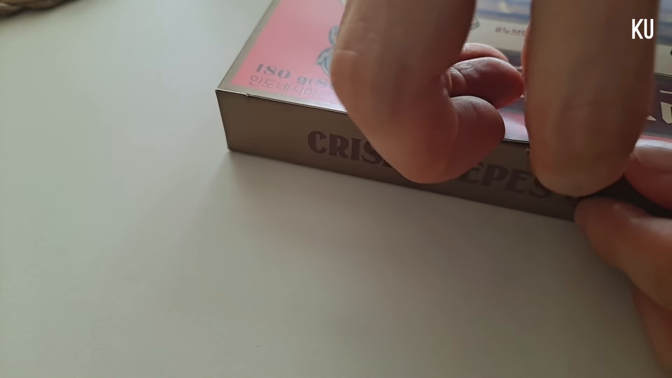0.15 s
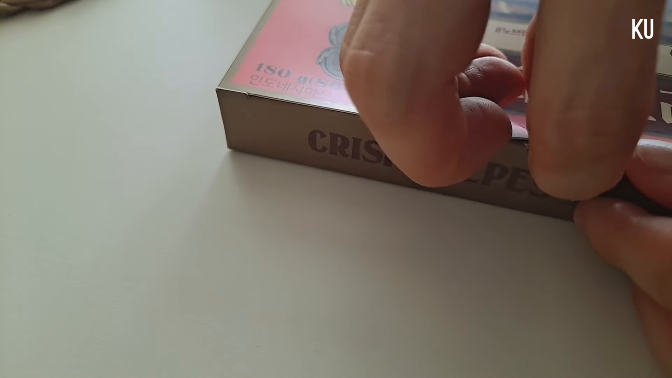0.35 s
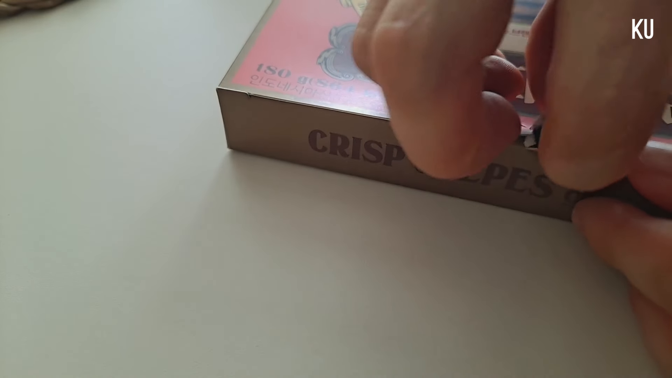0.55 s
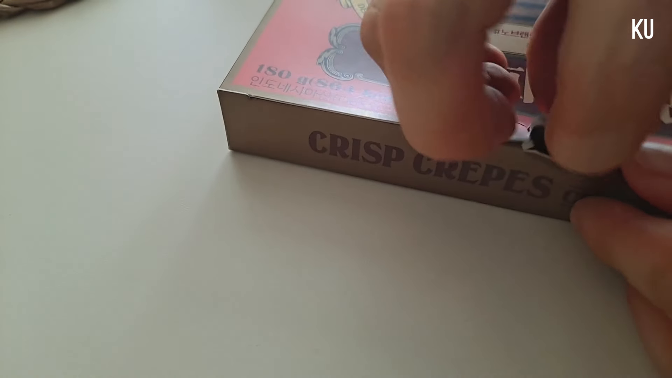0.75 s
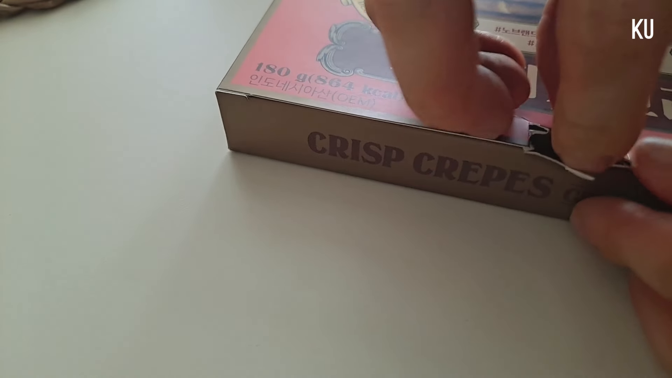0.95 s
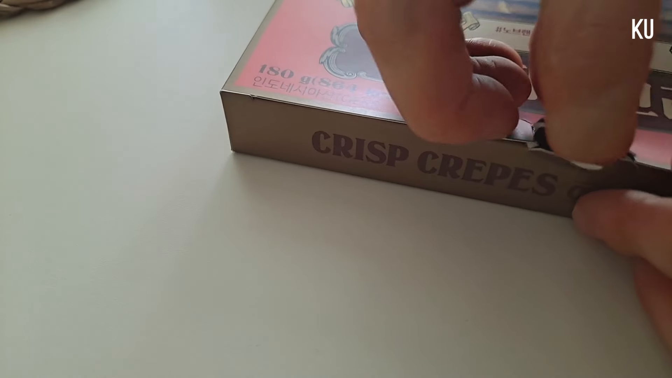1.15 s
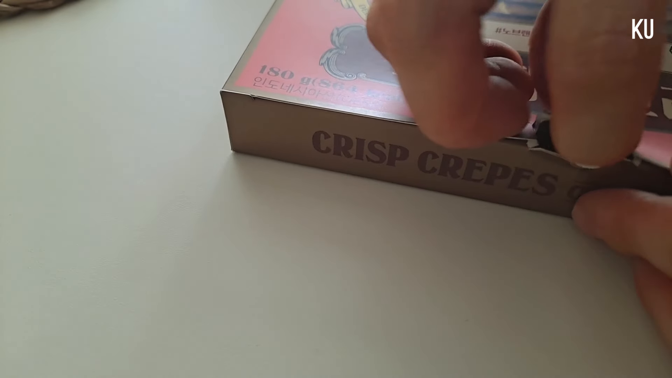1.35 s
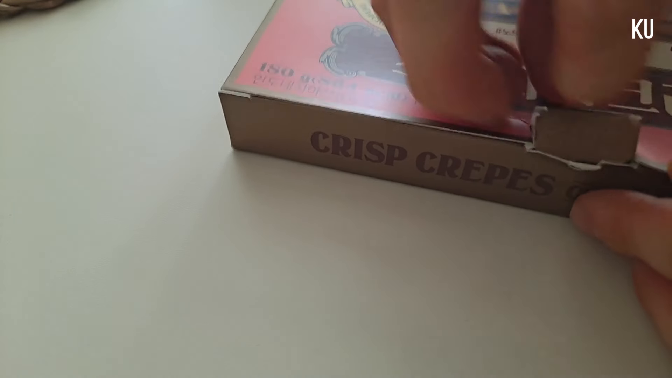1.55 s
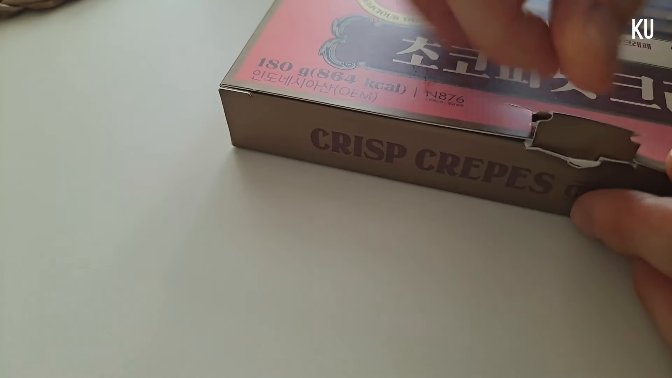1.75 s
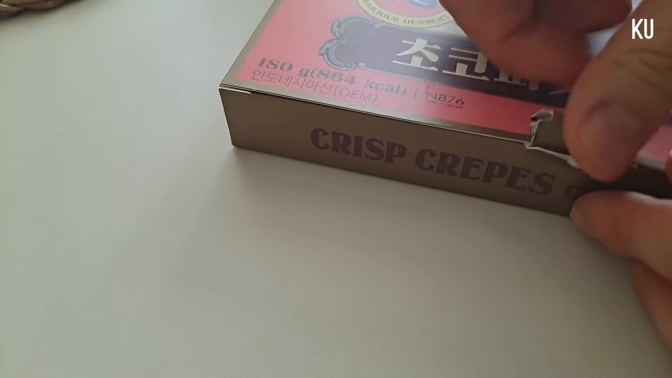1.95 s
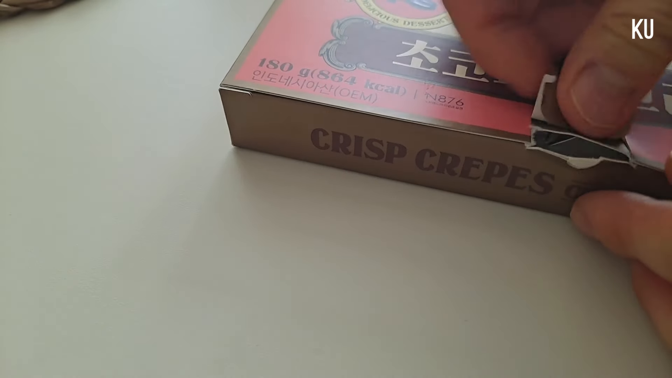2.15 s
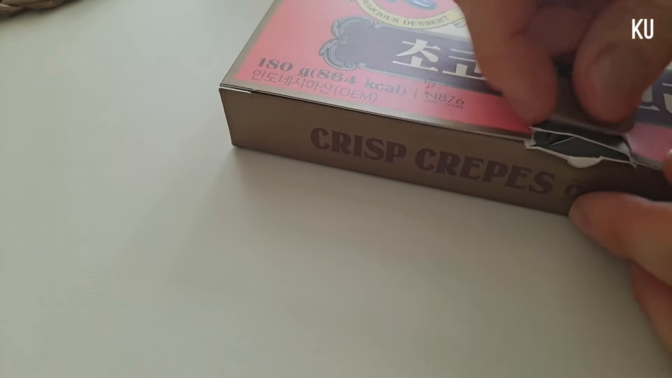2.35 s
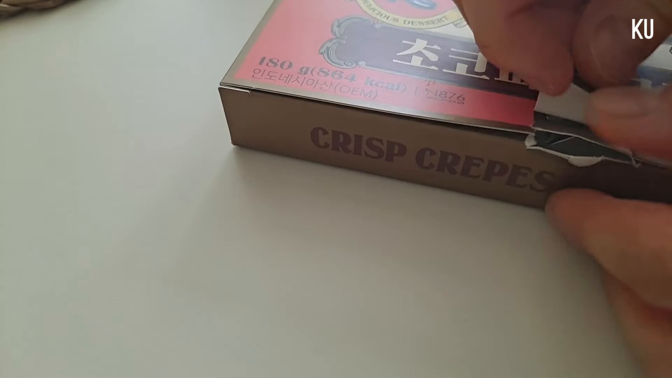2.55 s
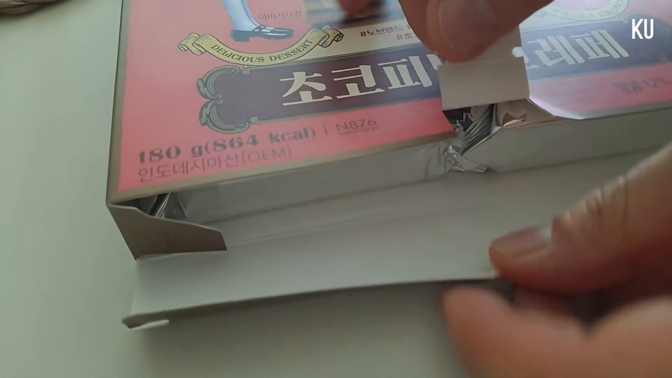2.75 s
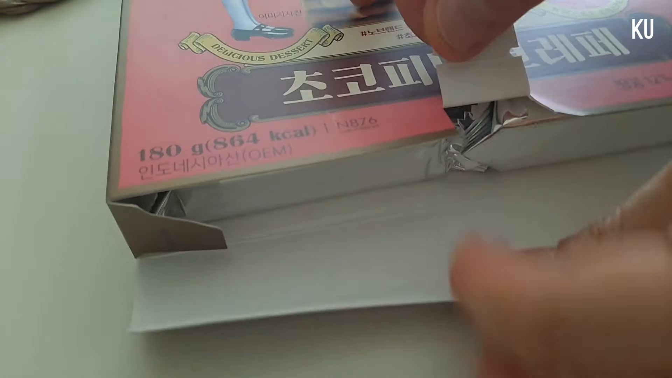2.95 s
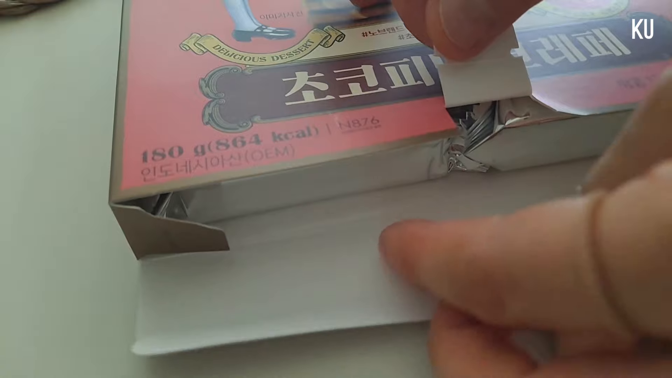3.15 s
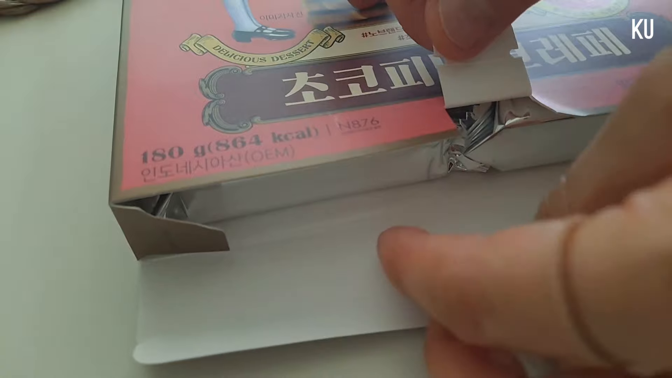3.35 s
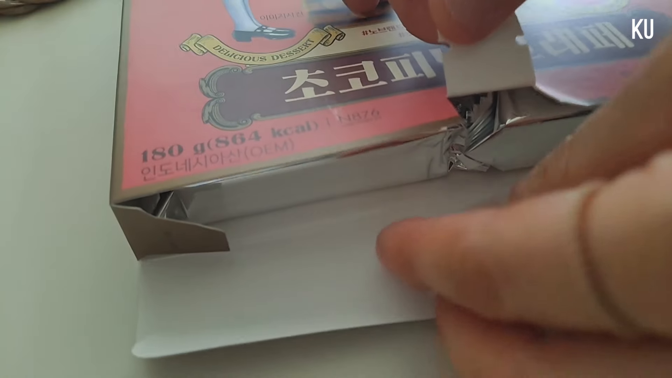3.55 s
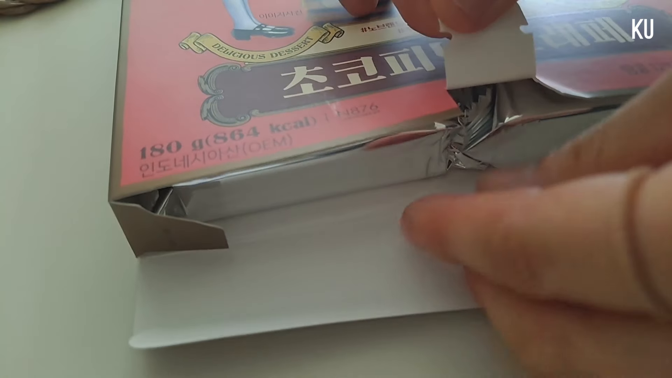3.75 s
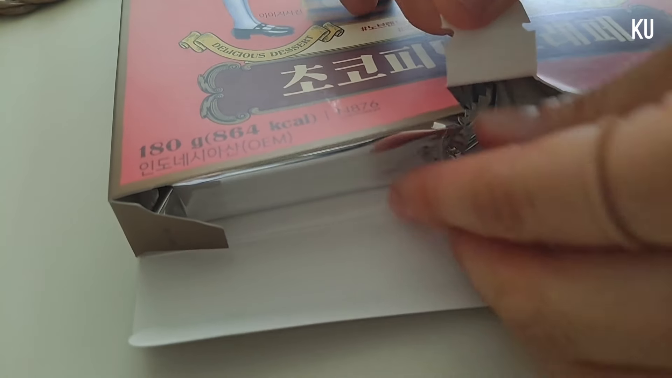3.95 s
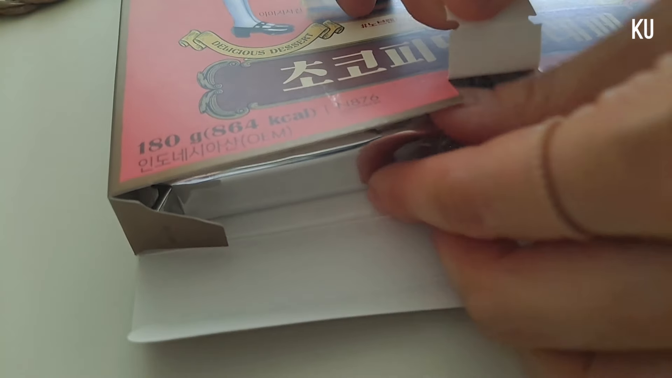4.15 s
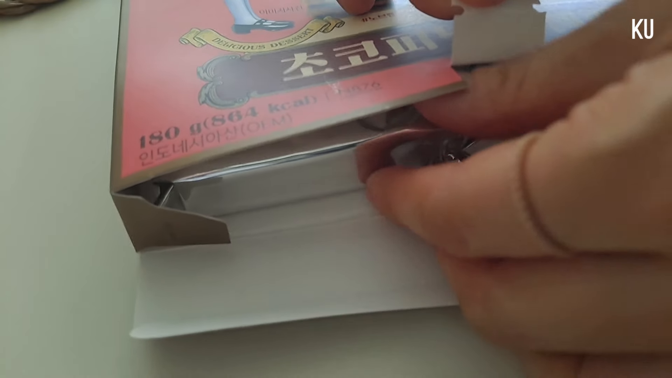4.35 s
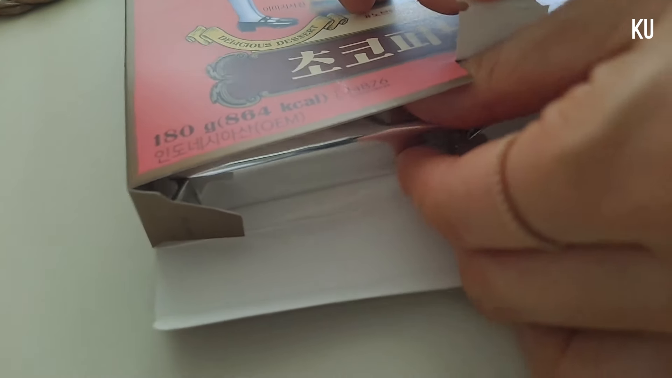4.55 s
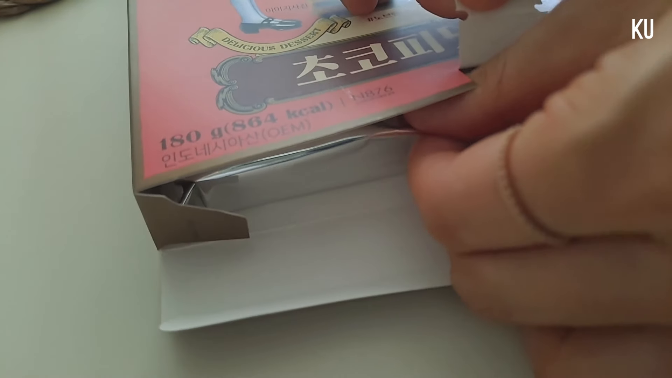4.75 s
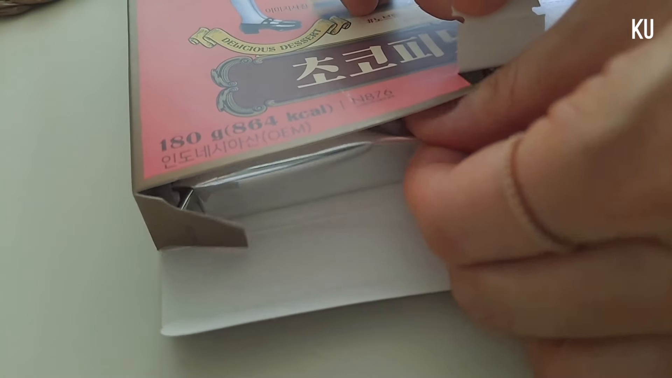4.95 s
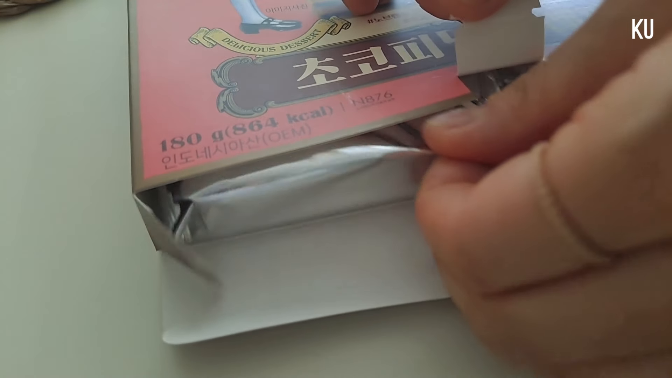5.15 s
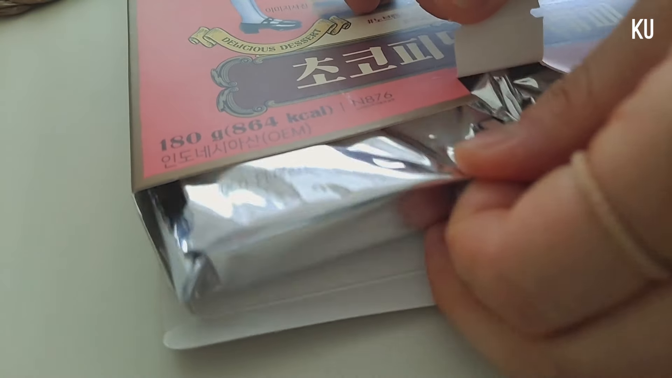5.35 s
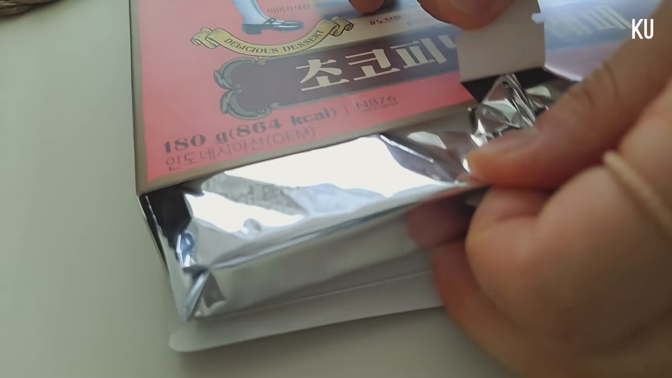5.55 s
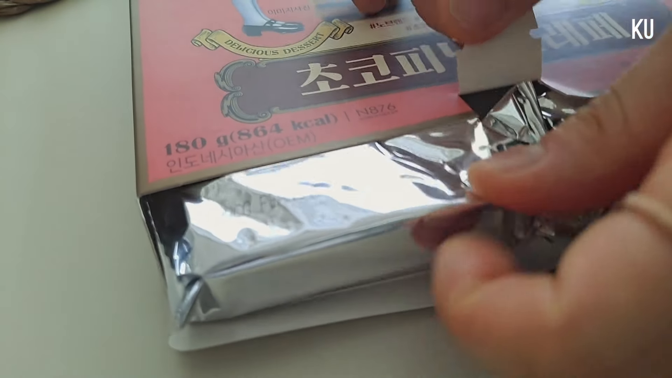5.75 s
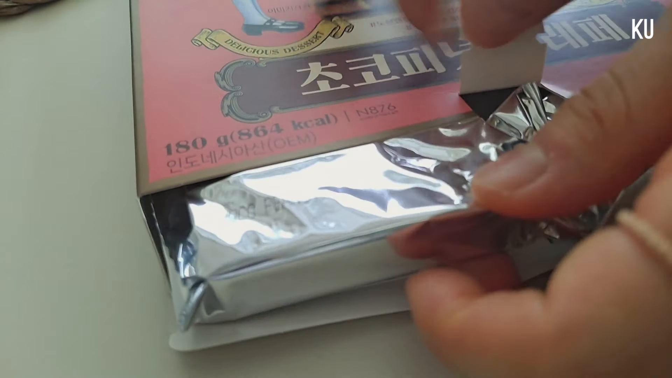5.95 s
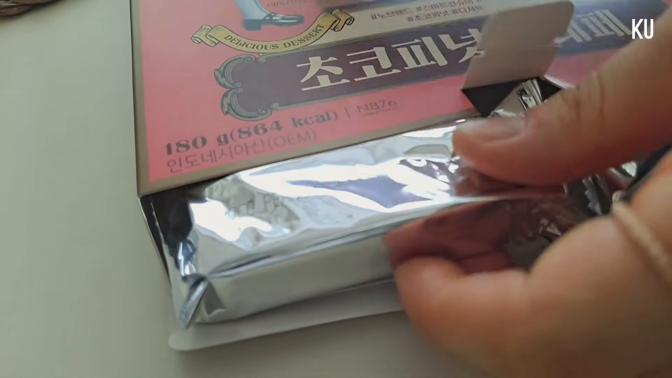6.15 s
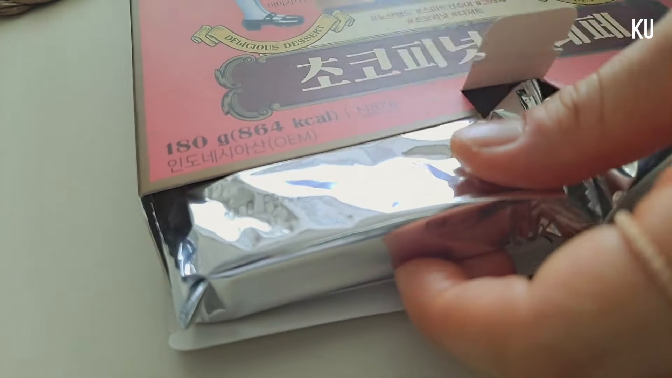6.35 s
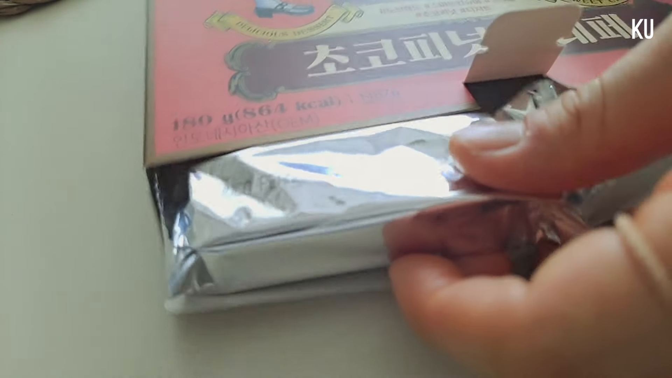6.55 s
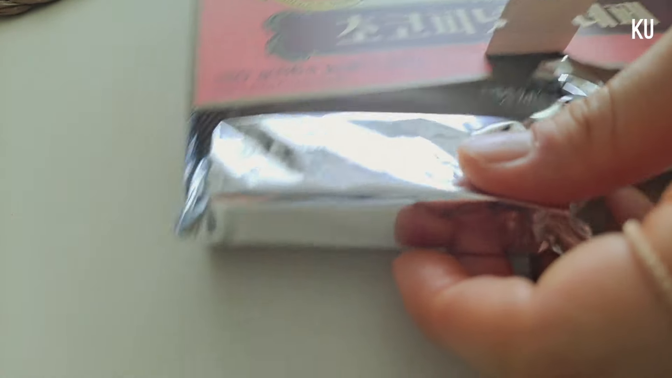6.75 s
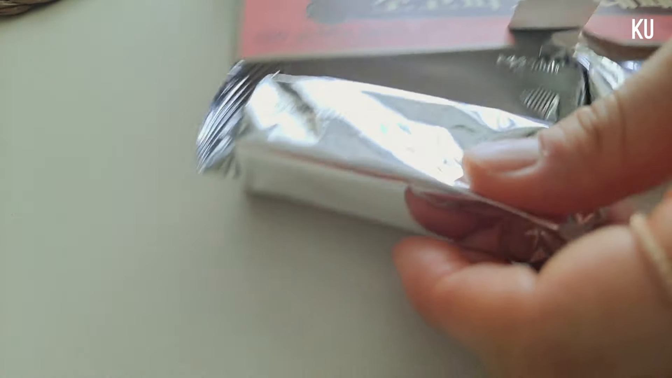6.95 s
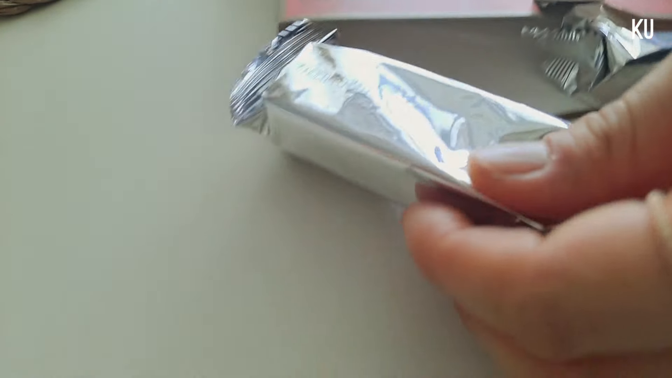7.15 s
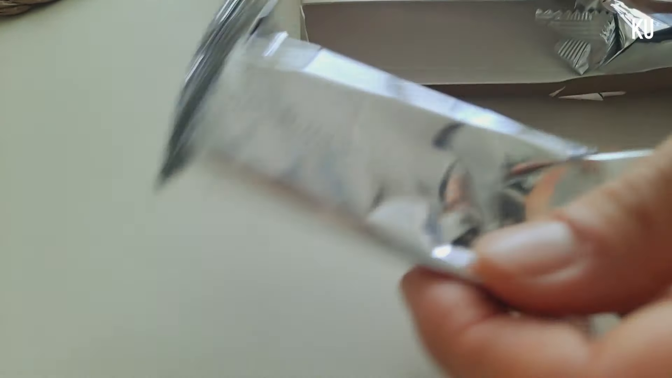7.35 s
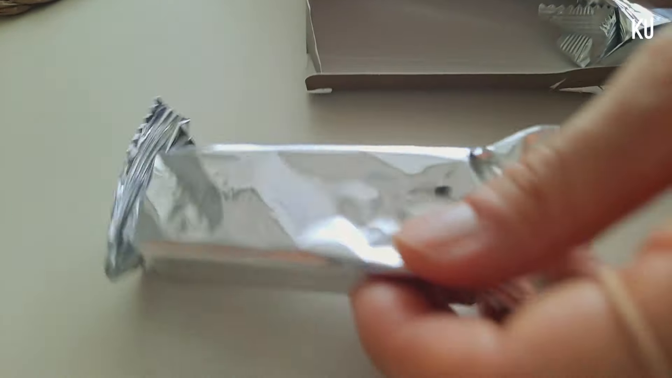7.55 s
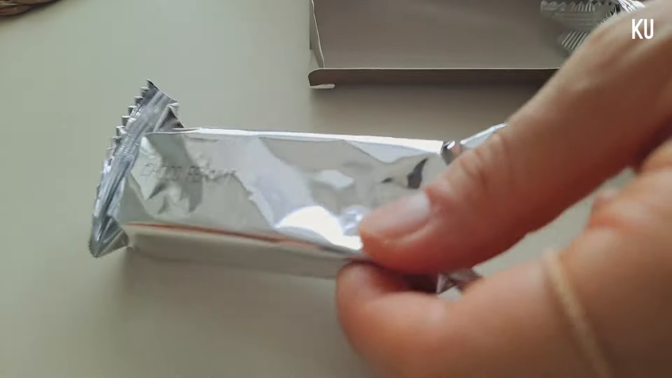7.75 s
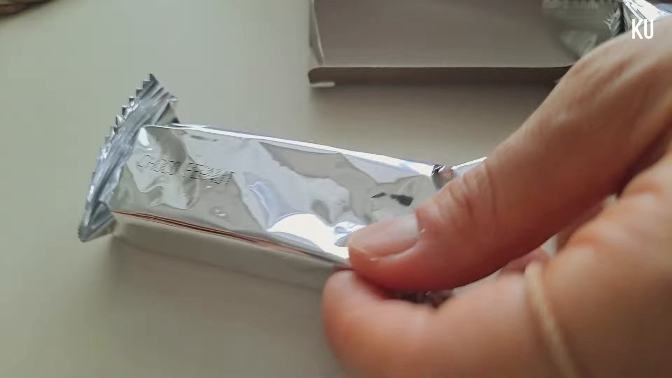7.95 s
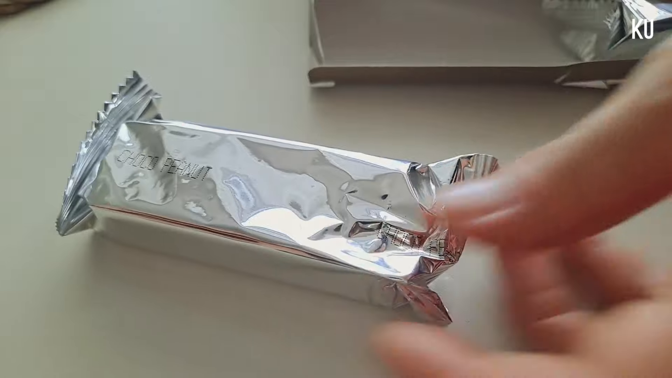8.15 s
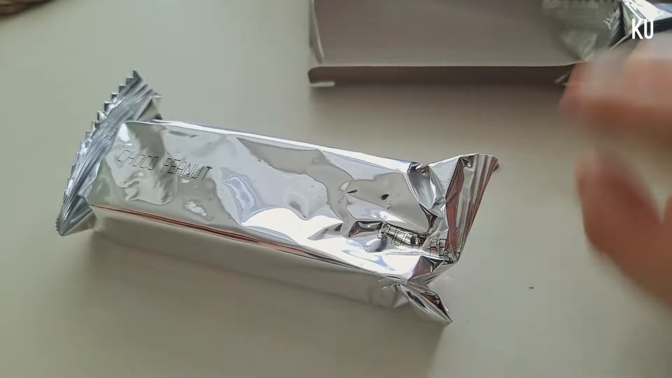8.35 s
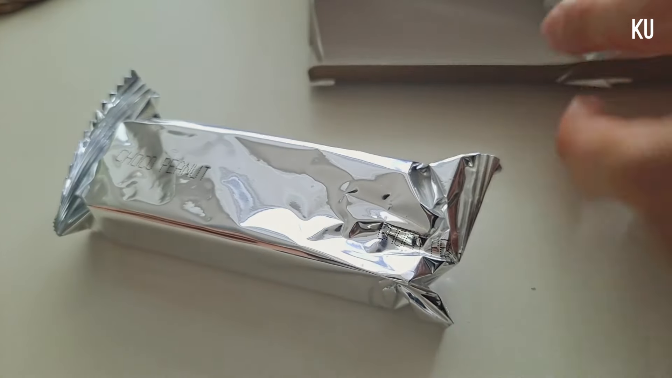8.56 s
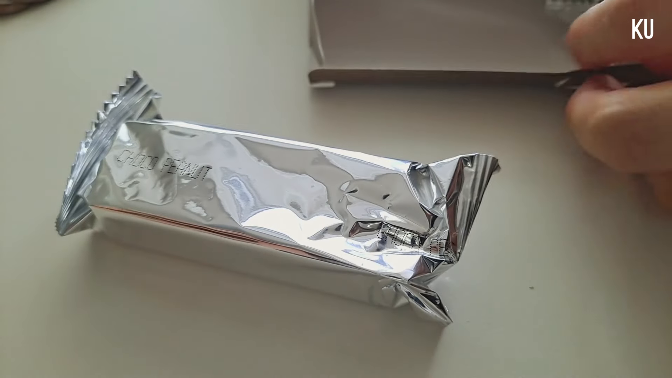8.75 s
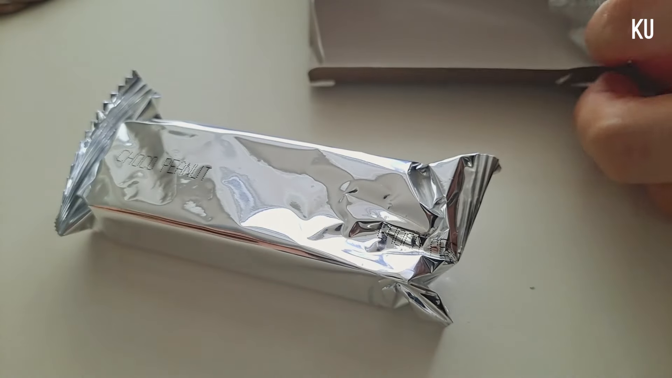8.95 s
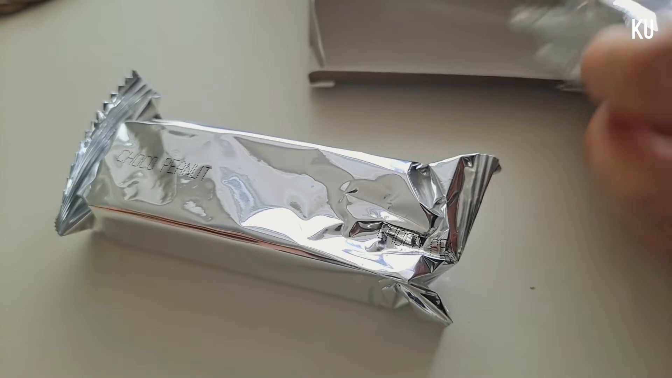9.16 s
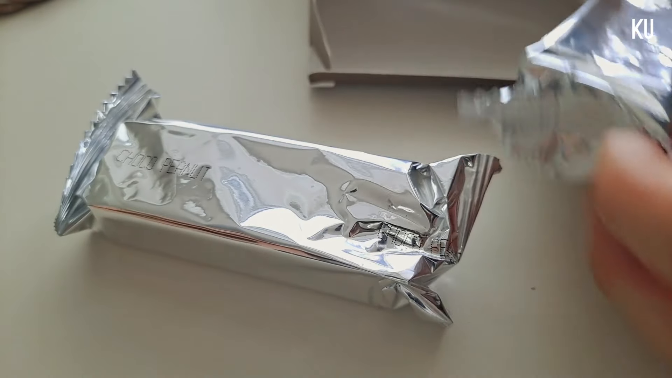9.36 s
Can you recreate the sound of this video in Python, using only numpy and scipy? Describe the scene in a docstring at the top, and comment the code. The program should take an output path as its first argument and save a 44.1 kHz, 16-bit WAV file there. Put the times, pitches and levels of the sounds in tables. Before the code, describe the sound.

Dry card snaps and a short flap rip give way to bright foil crackling as a wrapped snack is pulled out and set down.

```python
"""A cardboard snack box is opened on a table, close to the left of a pair of microphones in a small room.
First the card is rubbed and snaps, the flap rips free and creaks, and faint coloured hiss follows; then a
foil packet's crimped edge zips over the opening, the packet crinkles and is set down, and last the hand
goes back for another. Single snaps of a sheet, runs of stick and slip, and strokes of hiss that shed small
crinkles make the sound; soft table bumps and a steady room tone lie beneath."""
import sys
import numpy as np
from scipy import signal
from scipy.fft import rfft, irfft
from scipy.io import wavfile
from scipy.ndimage import uniform_filter1d, map_coordinates

SR = 44100
rng = np.random.default_rng(int(sys.argv[2]) if len(sys.argv) > 2 else 0)


def to_wav(sig):
    """Store sig (one row per channel, or 1-D mono) as 16-bit WAV at the path in sys.argv[1].

    Samples outside -1..1 are clipped; the rate is SR.
    """
    pcm = np.clip(np.atleast_2d(sig), -1, 1) * 32767
    pcm = np.round(pcm).astype(np.int16)
    wavfile.write(sys.argv[1], SR, pcm.T)  # frames by channels


N = 414099
TIME_S = np.arange(N) / SR


def from_db(db):
    """Decibels to gain."""
    return 10 ** (np.asarray(db) / 20)


def rms_one(x):
    """Scale to unit rms."""
    return x / np.sqrt(np.mean(x ** 2) + 1e-20)


def at_hz(points, hz):
    """Read (Hz, value) points on a log-frequency axis."""
    knots_hz, values = np.transpose(points)
    return np.interp(np.log(hz + 1), np.log(knots_hz), values)


def drift(rate_hz):
    """Random line through new normal draws, rate_hz of them a second."""
    return np.interp(TIME_S * rate_hz, np.arange(N // 20), rng.standard_normal(N // 20))


def filter_band(x, low_hz, high_hz):
    """Second-order Butterworth band-pass."""
    return signal.sosfilt(signal.butter(2, [low_hz, high_hz], "band", fs=SR, output="sos"), x)


def causal(gain):
    """Minimum-phase response with these magnitudes: nothing sounds before its cause."""
    cepstrum = irfft(np.log(gain + 1e-9))
    half = cepstrum.shape[-1] // 2
    cepstrum[..., 1:half] *= 2
    cepstrum[..., half + 1:] = 0
    return np.exp(rfft(cepstrum))


def shape(x, db_at, size=4096):
    """Filter by a gain in dB given as a function of frequency."""
    gain = from_db(db_at(np.fft.rfftfreq(size, 1 / SR)))
    kernel = irfft(causal(gain))
    return signal.fftconvolve(x, np.atleast_2d(kernel), axes=-1)[:, :N]


def pair(draws, likeness):
    """Left and right from one shared and two separate signals."""
    likeness = np.clip(likeness, 0, 1)
    return np.sqrt(likeness) * draws[0] + np.sqrt(1 - likeness) * draws[1:]


# ring width; share of brightness already present in the upper mids
RING_OCTAVES, PRESENCE_SHARE = 0.34, 0.67


def sheet_colour(ring_hz, bass_db, bright_db, ring_db, sub_db, top_db):
    """A patch rings at its own pitch; a large one has more bass, a sharp fold more treble: (Hz, dB)."""
    hz = np.geomspace(40, 17000, 80)
    slope_db = at_hz([(60, bass_db + sub_db), (300, bass_db), (700, 0.011), (1700, 0.0011),
                      (3500, PRESENCE_SHARE * bright_db), (10500, bright_db),
                      (16000, bright_db + top_db)], hz)
    octaves = np.log2(hz / ring_hz)
    return np.transpose([hz, slope_db + ring_db * np.exp(-.5 * (octaves / RING_OCTAVES) ** 2)])


def snap(colour, flutter_s, crack, likeness, size=2048):
    """A sheet jumps: a crack and a brief decaying flutter, coloured; unit energy."""
    decay = np.exp(-np.arange(size) / SR / flutter_s)
    flutter = pair(rng.standard_normal((3, size)), likeness) * decay
    flutter[:, 0] += crack * rng.choice([-1, 1])
    spectrum = rfft(flutter)
    # flatten the spectrum: colour alone sets its broad balance
    spectrum /= np.sqrt(uniform_filter1d(np.abs(spectrum) ** 2, size=31))
    gain = from_db(at_hz(colour, np.fft.rfftfreq(size, 1 / SR)))
    sound = irfft(spectrum * causal(gain))[:, :size // 2]
    return sound / np.sqrt(np.sum(sound ** 2) / 2)


def snaps(rows, colours, flutter_s, crack, likeness):
    """A snap for each row (t/s, energy/dB, ...)."""
    out = np.zeros((2, N + SR))
    for (t_s, db, *_), colour in zip(rows, colours):
        sound = from_db(db) * snap(colour, flutter_s, crack, likeness)
        start = round(t_s * SR)
        out[:, start:start + sound.shape[1]] += sound
    return out[:, :N]


def stick_slip(pull, colour, scatter_db, jitter_s, flutter_s, crack, likeness):
    """A pulled edge catches and lets go at the rate of the pull, one uneven snap each time."""
    pull_s, rate_hz, db = np.transpose(pull)
    t = np.arange(pull_s[0], pull_s[-1], 1 / SR)
    travel = np.cumsum(np.interp(t, pull_s, rate_hz)) / SR
    slip_s = np.interp(np.arange(travel[-1]), travel, t)
    rows = np.transpose([slip_s, np.interp(slip_s, pull_s, db)])
    rows += rng.standard_normal((len(slip_s), 2)) * [jitter_s, scatter_db]
    return snaps(rows, [colour] * len(rows), flutter_s, crack, likeness)


# room tone spectrum, relative: f/Hz, density/dB
ROOM_TONE_COLOUR = [(18, -53), (30, -22.5), (59, -11), (90, -16), (124, -7), (179, -24.5), (355, -19.5),
                    (760, -34.5), (16000, -45)]
ROOM_TONE_RMS_DB = -72


def room_tone():
    """Steady coloured noise, partly shared by both ports."""
    noise = pair(rng.standard_normal((3, N)), 0.52)
    return from_db(ROOM_TONE_RMS_DB) * rms_one(shape(noise, lambda hz: at_hz(ROOM_TONE_COLOUR, hz)))


# soft bumps of box and hand on the table: t/s, level/dB before layer gain, f/Hz
TABLE_BUMPS = [(0.038, -50, 80.7), (0.1, -50, 72.7), (1.418, -39.5, 87.8), (1.47, -40.5, 70.8),
               (2.083, -40, 214), (2.595, -42, 280), (2.953, -52.5, 89), (3.006, -56, 77),
               (3.779, -48, 51.1), (3.859, -50.5, 217), (5.587, -42.5, 80.3), (6.657, -31, 137),
               (7.209, -41, 51.6), (7.849, -46, 92)]


def bumps(t60_s, rise_s, rattle):
    """The table gives a soft, damped, slightly ragged thud: a decaying sine plus low noise."""
    out, t = np.zeros(N + SR), np.arange(SR // 3) / SR
    for start_s, db, hz in TABLE_BUMPS:
        ragged = rms_one(filter_band(rng.standard_normal(len(t)), 45, 260))
        envelope = (1 - np.exp(-t / rise_s)) * from_db(db - 60 * t / t60_s)
        start = round(start_s * SR)
        out[start:start + len(t)] += (np.sin(2 * np.pi * hz * t) + rattle * ragged) * envelope
    return out[:N]


def slips(rate_hz, spread_db, flutter_s):
    """Tiny random slips of uneven size, each a short flutter; mean power 1."""
    sizes = from_db(spread_db * np.minimum(rng.exponential(1, N), 3)) * (rng.random(N) < rate_hz / SR)
    power = signal.lfilter([1], [1, -np.exp(-1 / (flutter_s * SR))], sizes ** 2 + 1e-18)
    return rms_one(np.sqrt(power))


def friction(grainy, patchy_db, likeness, count=15):
    """Hiss with tiny slips in it, its half-octave bands flickering; near white, rms 1."""
    grainy = np.clip(grainy, 0, 1)
    grip = np.sqrt(1 - grainy + grainy * slips(rate_hz=260, spread_db=10.0, flutter_s=0.0011) ** 2)
    # neighbouring bands draw on separate noises
    white = [pair(rng.standard_normal((3, N)), likeness) * grip for _ in range(2)]
    out, edges_hz = 0, np.geomspace(70, 17000, count + 1)
    for k, (low_hz, high_hz) in enumerate(zip(edges_hz, edges_hz[1:])):
        out = out + filter_band(white[k % 2], low_hz, high_hz) * from_db(patchy_db * drift(25))
    return rms_one(out)


STROKE_ATTACK_S, STROKE_RELEASE_DB_PER_S = .012, 299.5
STROKE_ARCH_DB = 3.5  # ends below middle


def stroke_db(t, length_s, db, swell_db):
    """A stroke arches, swells or fades over its length, then dies quickly."""
    from_middle = np.minimum(t / length_s, 1) - .5
    arch_db = STROKE_ARCH_DB * (2 * from_middle) ** 2
    release_db = STROKE_RELEASE_DB_PER_S * np.maximum(t - length_s, 0)
    return db + swell_db * from_middle - arch_db - release_db


# sliding strokes on card and foil, and faint coloured hiss between them: t/s, length/s,
# level/dB before layer gain, swell over stroke/dB, ring f/Hz, bass/dB, brightness/dB
HISS_STROKES = [(0, 0.33, -60, -17, 11000.0, 7.5, -20.5), (0.256, 0.32, -55.5, -3, 12000.0, -4, -18),
                (0.429, 0.071, -46, 16, 1830, -6, -7.5), (0.564, 0.11, -68, 8, 1500, -2, -19),
                (0.67, 0.35, -51.5, 2.5, 9660, -3, -21.5), (0.792, 0.036, -57, -9, 5200, -8, 0),
                (1.021, 0.23, -50.5, -18, 726, 3.5, -21.5), (1.256, 0.22, -45.0, -2.5, 12000.0, -4, -6.5),
                (1.412, 0.258, -39.5, -10, 500.0, 2.5, -18.5), (1.843, 0.23, -58, 2.5, 486, -8, -22),
                (1.926, 0.18, -40.0, 12, 880, -4.5, -9), (2.195, 0.31, -47, -4.5, 841, 1, -17.5),
                (2.581, 0.058, -46.5, -22, 670.0, 7, -29), (2.662, 0.19, -56.5, -1.5, 4270, 8, -4.5),
                (2.909, 0.21, -52.5, -11, 2030, 4, 12), (3.156, 0.21, -60, -9.5, 3950, 3, -8.5),
                (3.338, 0.25, -60, 6, 8400.0, -2, -8), (3.623, 0.095, -50, 7.5, 763, 10, 9),
                (3.723, 0.19, -60.5, 1.5, 787, 32.5, 9.5), (3.958, 0.16, -58, 7, 11040, -6, -17),
                (4.163, 0.18, -63, 8, 10000.0, -1.5, -21.5), (4.337, 0.16, -49, -6, 780, 4, -5),
                (4.492, 0.25, -49.5, -14, 12200, 3, -17), (4.776, 0.24, -50, -10.5, 1374, -4.5, -7.5),
                (4.987, 0.25, -41.5, -2.5, 11990, -11, -16), (5.205, 0.2, -39.5, -6, 12260, -6, -5),
                (5.398, 0.22, -53, 21.5, 2400.0, 2, -15), (5.602, 0.24, -57.5, 12, 1180, 3, -12),
                (5.77, 0.14, -52.5, 19, 1500.0, -4.5, -3.5), (5.955, 0.23, -58.5, -21, 485, -2, -14.5),
                (6.238, 0.3, -52, 8, 500.0, -2, -12.5), (6.491, 0.23, -45.0, -3, 2820, 2, -11.5),
                (6.638, 0.29, -39, 5, 1000, 1.5, -3.5), (6.924, 0.25, -43.5, 5.5, 493, 2.5, -9.5),
                (7.194, 0.14, -44, -25, 6200, -1.5, -13), (7.297, 0.37, -60.5, -3, 11900, -1, -19),
                (7.635, 0.14, -54.5, -28, 3000.0, -2.5, -10), (7.781, 0.049, -51.5, 27.5, 1830, 13.5, -6),
                (7.897, 0.15, -63.0, 17, 1970, -7, -11), (8.553, 0.088, -67, -13.5, 4420, -5, -9),
                (8.708, 0.27, -56.5, 0.5, 4320, -7, -13.5), (9.008, 0.22, -48.0, 5, 720.0, -3.5, -8.5),
                (9.236, 0.13, -34, -1, 2440, -4.5, -11)]


def rubbing(size=2048):
    """Grainy hiss in each row's own colour: sliding on card and foil, and faint hiss between."""
    hiss, out = friction(grainy=0.48, patchy_db=3.0, likeness=0.46), np.zeros((2, N))
    for start_s, length_s, db, swell_db, *patch in HISS_STROKES:
        start = round(start_s * SR)
        span = slice(start, min(start + round(length_s * SR) + SR // 4, N))
        t = TIME_S[span] - TIME_S[start]
        colour = sheet_colour(*patch, ring_db=7, sub_db=-8, top_db=-1.5)
        gain = rms_one(from_db(at_hz(colour, np.fft.rfftfreq(size, 1 / SR))))
        envelope = from_db(stroke_db(t, length_s, db, swell_db)) * np.minimum(t / STROKE_ATTACK_S, 1)
        stroke = hiss[:, span] * envelope
        out[:, span] += signal.fftconvolve(stroke, [irfft(causal(gain))], axes=-1)[:, :len(t)]
    return out


# rate in a firm stroke, level of a firm stroke, crinkle energy over stroke level
CRINKLES_PER_S, FIRM_STROKE_DB, CRINKLE_DB = 34, -44, 17


def crinkles(scatter_db, low_hz, high_hz, count=24):
    """Small folds give way at random, more under a firm stroke, each ringing at its own pitch."""
    rows, colours = [], []
    for start_s, length_s, db, swell_db, _, bass_db, bright_db in HISS_STROKES:
        expected = CRINKLES_PER_S * length_s * from_db(.5 * (db - FIRM_STROKE_DB))
        for chance, when, force, pitch in rng.random((count, 4)):
            t = when * length_s
            if chance < expected / count and start_s + t > 0:
                level_db = stroke_db(t, length_s, db, swell_db) + CRINKLE_DB + scatter_db * (force - .5)
                rows.append((start_s + t, level_db))
                ring_hz = low_hz * (high_hz / low_hz) ** pitch
                colours.append(sheet_colour(ring_hz, bass_db, bright_db, ring_db=13, sub_db=-17.5, top_db=-1))
    return snaps(rows, colours, flutter_s=0.00047, crack=4, likeness=.55)


# foil buckling and knocking on the box: t/s, level/dB (energy, before layer gain), ring f/Hz,
# bass/dB, brightness/dB
FOIL_BUCKLES = [(4.4778, -19.5, 580.0, -1, -37), (4.4938, -6.5, 2020, 1, -10),
                (4.5029, -4, 12400, -0.5, -11), (4.5349, -7.5, 497, -7, -12.5), (4.5508, -16, 2380, -4, -9),
                (4.5906, -8, 2560, -8, -6), (4.6172, -10.5, 960.0, -11, -22), (4.6921, -12.5, 537, -1, -7),
                (4.8098, -14.5, 790, -17, -6), (4.8413, -18, 12000.0, -10, -1),
                (4.8495, -18.5, 12000.0, -21, 3), (4.8968, -15.5, 12000.0, -6, -20),
                (4.9282, -10.5, 3340, -19, -23), (5.01, -10.5, 12200, -17, -2),
                (5.0254, -12.5, 12100, -25, -14), (5.0605, -7.5, 12200, -15, 6),
                (5.0773, -15, 6300.0, -13.5, 3), (5.1101, -2.5, 493, -28, -16),
                (5.1559, -10.5, 8400.0, -21, -25.5), (5.4645, -7, 490, -30, -4),
                (5.5836, -10.5, 3290, -3, -16), (5.7775, -19, 570, 11.5, -22), (5.9772, -7.5, 492, -26, -6),
                (6.084, -12.0, 2550, -20.5, -1.5), (6.1357, -20, 3290, -10, -37),
                (6.4233, -26, 615, 2, -37.5), (6.4635, -18, 1300.0, -2, -26.5),
                (6.4991, -9.5, 484, -31, -39), (6.52, -9.5, 540.0, -14, -22),
                (6.5337, -12, 10000.0, -24, -21), (6.5668, -5.5, 3340, -14, -5.5),
                (6.6215, -12.5, 2596, -23, -10.5), (6.6603, 0.5, 5900, 13, -11),
                (6.7585, -9.5, 12000.0, -11, -4), (6.7745, -8, 2640, -10, -20),
                (6.821, -12.5, 12060, -18.5, -14), (6.8571, 3, 3000.0, -22, -20),
                (7.0848, -11.5, 501, -5.5, -2.5), (7.1211, -14, 11980, -0.5, -4.5),
                (7.1449, -16.0, 12000.0, -2, -0.5), (7.172, -8, 2100.0, -11, -3.5),
                (7.1764, -7.5, 2000.0, -9.5, -6), (7.2009, 3.5, 1740, 4, 4.5), (7.3371, -22, 499, -3, 16),
                (7.5875, -21, 1800.0, -19.5, -1.5), (7.6449, -1, 924, -19.5, 4),
                (7.8029, -20, 2400.0, -0.5, -4), (7.829, -11.5, 770.0, -1.5, -1),
                (8.7626, -26, 3810, -12, -33), (8.814, -12, 1800.0, -10, 21),
                (8.837, -15, 4700.0, -31, -21), (9.0343, -18, 4600, -22, -10), (9.1467, -10, 670.0, -9, -7),
                (9.2103, -8.5, 1786, -19, -16.5), (9.2812, -7, 2100.0, -7.5, 4),
                (9.3286, -3.5, 3430, -25, -17), (9.3552, -9.5, 720.0, -3, 12)]
# crimp passing the box edge, slowing: t/s, rib rate/Hz, level/dB (energy, before layer gain)
CRIMP_PULL = [(5.2155, 215, -0.5), (5.29, 175, -7), (5.335, 151, -0.5), (5.355, 142, -7.5),
              (5.41, 73, -8.5), (5.43, 46, -10), (5.505, 41, -7)]
# relative zip spectrum: f/Hz, density/dB
CRIMP_COLOUR = [(180, -33), (300, -10), (392, -21.5), (584, -14.5), (2000, -5), (2400, -21), (3350, 2),
                (4090, -13.5), (9390, -9), (12100, -0.5), (16000, -0.5)]


def foil():
    """The packet buckles in single snaps; its crimp zips rib by rib along the card."""
    colours = [sheet_colour(*row[2:], ring_db=10, sub_db=-12.0, top_db=2.5) for row in FOIL_BUCKLES]
    crinkling = snaps(FOIL_BUCKLES, colours, flutter_s=0.0014, crack=2.65, likeness=0.32)
    zipping = stick_slip(CRIMP_PULL, CRIMP_COLOUR, scatter_db=4.0, jitter_s=0.00039,
                         flutter_s=0.00019, crack=2.7, likeness=0.24)
    return from_db(2.1) * crinkling + from_db(-2.0) * zipping


# cardboard snapping; the rows from 2.40 to 2.50 s are further slips of the creak, about 40 a second: # t/s,
# level/dB (energy, before layer gain), ring f/Hz, bass/dB, brightness/dB
CARD_JUMPS = [(0.0259, -25.5, 10000, 2, 2), (0.0304, -18.5, 1200.0, 0, -6), (0.0618, -20.5, 1500, -8, -10),
              (0.0688, -19, 960.0, 2, -11), (0.1193, -22.5, 830.0, -5, -8), (0.1496, -21, 825, -3, -7),
              (0.19, -27, 1800, -6, -6), (0.2222, -20.0, 500.0, -30, -21), (0.2785, -26, 12000, -5, 5),
              (0.2854, -17, 490, 1, -14), (0.3385, -21, 12000.0, -1, -10), (0.5073, -5.5, 1976, -7, 3),
              (0.5213, -12.5, 1700.0, -1, 16), (0.7846, -17, 9900, -5, -39), (0.8733, -23.5, 6400, -8, -26),
              (1.0483, 3.5, 2830, -21, -24), (1.1503, -21.5, 3280, -18, -31.5),
              (1.178, -18.5, 3285, -16, -38.5), (1.2195, -13, 4560, -3.5, 8), (1.2687, -19, 1830, 6, -4),
              (1.3352, -14.5, 2330, -11, 3.5), (1.455, 7, 2430, -3.5, -20), (1.5621, -16.5, 489, 3, -24),
              (1.6054, -8, 880, 1, -10.5), (1.6208, -15.5, 1500.0, -10, -17.5),
              (1.7014, -24, 1710, -1.5, -35), (1.8751, -25.5, 1677, -9.5, -19.5),
              (2.0822, 1.5, 950, -3, -8), (2.403, -10.5, 1770, -8, -24), (2.4522, -20, 4650, -16, -21),
              (2.4775, -24, 940, 0, -18), (2.4998, -32, 4730, -10, -30), (2.5926, -9, 620.0, 9.5, -17),
              (2.9489, -17.5, 2800.0, -16, -1.5), (3.4864, -16.5, 3500.0, -10.5, 5.5)]
# flap ripping, fibres breaking ever faster: t/s, break rate/Hz, level/dB (energy, before layer gain)
FLAP_RIP = [(2.034, 163, -17.5), (2.06, 167, -10.5), (2.08, 240, 5.5), (2.107, 364, 4.5)]
# relative rip spectrum: f/Hz, density/dB
FLAP_RIP_COLOUR = [(88, -54), (150, -21.5), (205, -16), (888, -8), (979, -7), (1080, -13.5), (1420, -16.5),
                   (2220, -30.5), (5790, -32.5), (7040, -14.5), (8400, -12), (10000, -31.5), (16000, -24.5)]
# card sticking and slipping on card; its further slips up to 2.5 s stand in CARD_JUMPS: # t/s, slip rate/Hz,
# level/dB (energy, before layer gain)
CARD_CREAK = [(2.2437, 45.4, -15.5), (2.277, 33.2, -9), (2.32, 106, -9.5), (2.34, 60, -6.5),
              (2.39, 47, -7.5)]
# relative creak spectrum: f/Hz, density/dB
CARD_CREAK_COLOUR = [(88, -61), (150, -23), (391, -4.5), (524, -2), (941, 0), (1340, 0.5), (1830, -21.5),
                     (5250, -18), (16000, -44)]


def cardboard():
    """The flap snaps, rips free fibre by fibre and creaks as card slips on card."""
    colours = [sheet_colour(*row[2:], ring_db=9, sub_db=-17, top_db=-0.5) for row in CARD_JUMPS]
    snapping = snaps(CARD_JUMPS, colours, flutter_s=0.0022, crack=8.3, likeness=0.59)
    ripping = stick_slip(FLAP_RIP, FLAP_RIP_COLOUR, scatter_db=3.5, jitter_s=.0006,
                         flutter_s=0.0013, crack=2.4, likeness=1.0)
    creaking = stick_slip(CARD_CREAK, CARD_CREAK_COLOUR, scatter_db=0.7, jitter_s=0.000394,
                          flutter_s=0.0009, crack=5.0, likeness=0.87)
    return from_db(1.3) * snapping + from_db(-5.0) * ripping + from_db(-2.0) * creaking


# modes of box and film: f/Hz, width/Hz, lift/dB
BOX_AND_FILM_MODES = [(227, 37, 3), (367, 22, 3.5), (576, 160, 7), (707, 70, 1.5), (967, 140, 4),
                      (1330, 81, 1.5), (1966, 200, 2.5), (4860, 2200, 2.5), (12040, 2800, 4.5)]


def resonate(x):
    """Box and film lift the sound around each of their modes."""
    def lift_db(f_hz):
        return sum(db / (1 + (2 * (f_hz - hz) / width_hz) ** 2) for hz, width_hz, db in BOX_AND_FILM_MODES)
    return shape(x, lift_db)


def room(x, echo_db, echo_s, tail_db, t60_s, treble_t60_s):
    """A near surface answers once; then the small room dies away, sooner in the treble."""
    t = np.arange(SR // 2) / SR
    noise = rng.standard_normal((2, len(t)))
    dull = signal.sosfilt(signal.butter(1, 2500, fs=SR, output="sos"), noise)
    tail = dull * from_db(-60 * t / t60_s) + 1.3 * (noise - dull) * from_db(-60 * t / treble_t60_s)
    tail *= 1 - np.exp(-t / 0.0048)
    echo = rng.standard_normal((2, len(t))) * (t > echo_s) * np.exp(-np.abs(t - echo_s) / 0.00081)
    response = (from_db(tail_db) * rms_one(tail) + from_db(echo_db) * rms_one(echo)) / np.sqrt(len(t))
    return signal.fftconvolve(x, response, axes=-1)[:, :N]


# left over right: f/Hz, level/dB
LEFT_OVER_RIGHT = [(100, 13), (480, 12.5), (950, 8), (1900, 11), (4000, 15), (8000, 15), (14000, 21.5)]
# hands moving across the ports: t/s, extra left-over-right level/dB, right delay/ms
HAND_PATH = [(0, -5, 0.053), (1.5, -7.5, 0.021), (2.3, -7, 0.0012), (3.8, -6, 0.14), (5.3, -5.5, 0.16),
             (6.8, -6, 0.16), (7.899, -3.5, 0.21), (8.8, -9, 0.035), (9.39, -6.5, -0.064)]


def microphones(x):
    """The left port hears the hands louder and brighter, and sooner while the right delay is positive."""
    path_s, lean_db, late_ms = np.transpose(HAND_PATH)
    lean = from_db(np.interp(TIME_S, path_s, lean_db) * np.array([[.25], [-.75]]))

    def share_db(hz):
        lead_db = at_hz(LEFT_OVER_RIGHT, hz) * np.array([[1], [-1]])
        return 10 * np.log10(2 / (1 + 10 ** (-lead_db / 10)))
    left, right = shape(x * lean, share_db)
    lag_samples = np.interp(TIME_S, path_s, late_ms) * SR / 1000
    return np.array([left, map_coordinates(right, [np.arange(N) - lag_samples], order=3)])


def scene():
    """Card, foil and hiss pass the box modes; with the bumps they arrive directly and via the room."""
    handling = cardboard() + foil() + from_db(-0.22) * rubbing()
    handling += crinkles(scatter_db=10.5, low_hz=690, high_hz=6000)
    handling = resonate(handling)
    handling += from_db(3.5) * bumps(t60_s=0.16, rise_s=0.00087, rattle=.4)
    wet = room(handling, echo_db=-22.0, echo_s=0.007, tail_db=-16, t60_s=0.39, treble_t60_s=0.2)
    return microphones(handling + wet) + room_tone()


LOW_CUT_HZ, HIGH_CUT_HZ = 38, 16100


def record(dry):
    """The deepest bass rolls off; the top is cut steeply."""
    trimmed = signal.sosfilt(signal.butter(2, LOW_CUT_HZ, "high", fs=SR, output="sos"), dry)
    return signal.sosfilt(signal.ellip(10, .2, 80, HIGH_CUT_HZ, fs=SR, output="sos"), trimmed)


dry = scene()
out = record(dry)
to_wav(out)
```